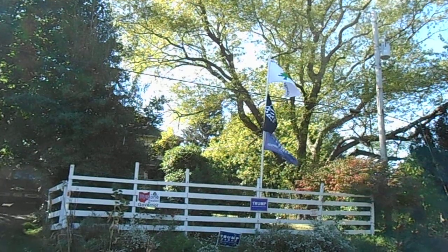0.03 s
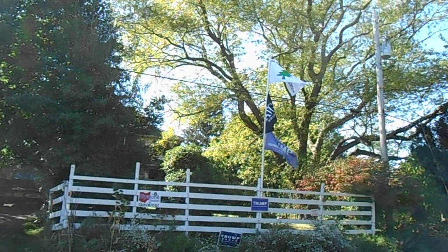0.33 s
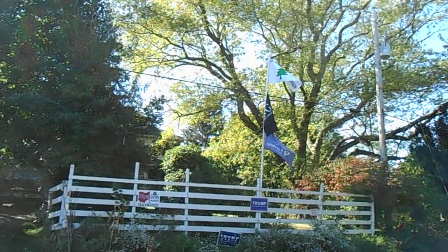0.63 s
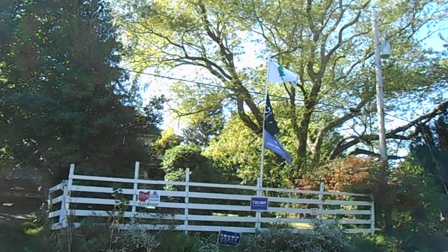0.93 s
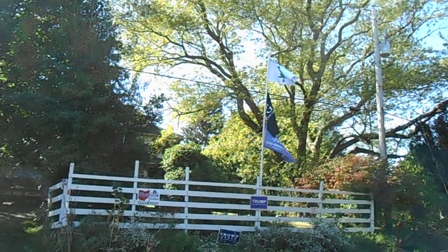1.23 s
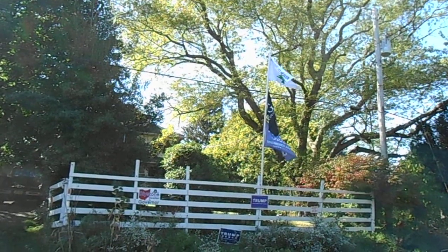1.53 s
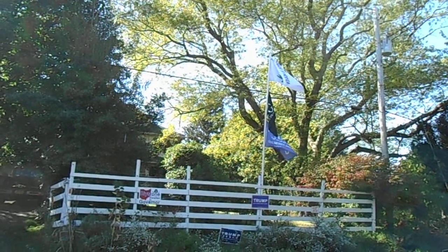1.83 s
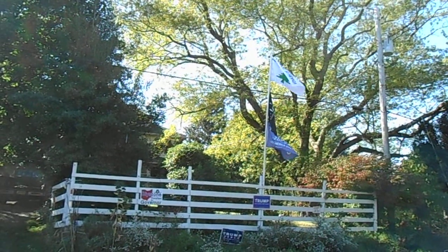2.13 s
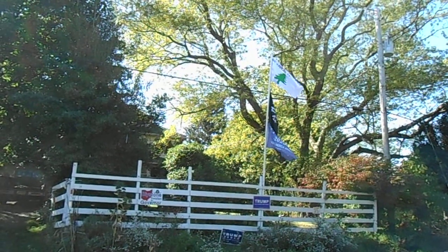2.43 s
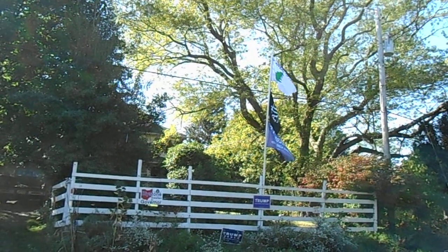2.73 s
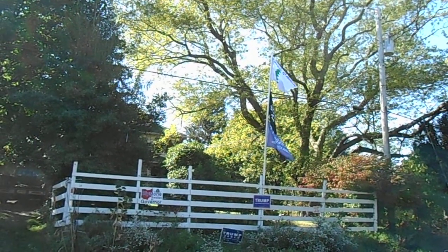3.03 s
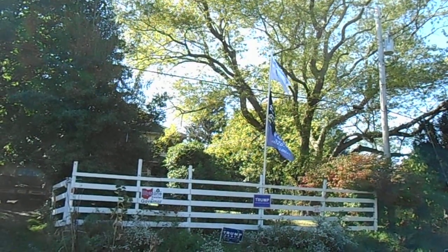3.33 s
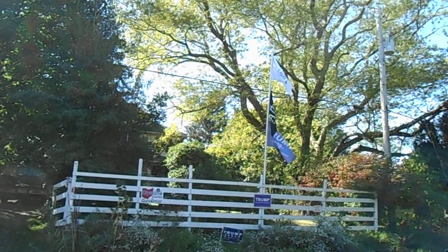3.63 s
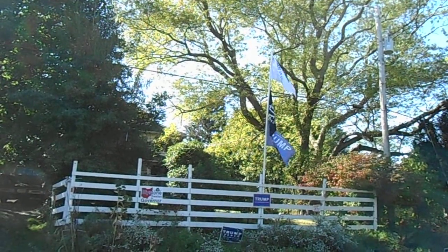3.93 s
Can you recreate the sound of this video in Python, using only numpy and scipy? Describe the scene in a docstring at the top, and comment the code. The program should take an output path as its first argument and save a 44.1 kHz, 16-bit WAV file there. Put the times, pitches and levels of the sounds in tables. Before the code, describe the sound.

Traffic rushes steadily along a highway behind trees, tyres roaring over a low engine drone. One nearer car whines past at the start, then wind bumps the microphone while crickets trill faintly and leaves rustle in a garden.

```python
"""Traffic rushes along a highway behind trees: tyres roar and sing over a low drone of engines.
One nearer car whines past in the first second, and a few exhaust notes swell and fade.
A breeze rustles the leaves and bumps the microphone with short buffets and pops of swirling air.
Crickets trill faintly in the garden, one tiny falling tone for each stroke of their wings."""
import sys
import numpy as np
from scipy import signal
from scipy.fft import rfft, irfft, next_fast_len
from scipy.io import wavfile
from scipy.ndimage import uniform_filter1d, minimum_filter1d, map_coordinates

SR = 44100
rng = np.random.default_rng(int(sys.argv[2]) if len(sys.argv) > 2 else 0)


def pcm_store(signal):
    """Save signal as 16-bit PCM."""
    levels = np.round(np.clip(np.atleast_2d(signal), -1, 1) * 32767)
    wavfile.write(sys.argv[1], SR, levels.astype(np.int16).T)


N = 176400  # 4 seconds
T = np.arange(N) / SR


def amp(db):
    """Turn decibels into a number to multiply by."""
    return 10 ** (np.asarray(db) / 20)


def unit(x):
    """Scale a signal so that its average strength (rms) is 1."""
    return x / np.sqrt(np.mean(x ** 2) + 1e-20)


def curves(rows):
    """Join a table's points with straight lines: one curve for each column after the time."""
    times, *columns = np.transpose(rows)
    return [np.interp(T, times, column) for column in columns]


def wobble(rate):
    """A smooth random curve that passes through `rate` new values a second."""
    return map_coordinates(rng.standard_normal(int(N * rate / SR) + 4), [T * rate])


def swell(peak_s, half_width_s):
    """A bell-shaped rise and fall around one moment."""
    return np.exp(-.5 * ((T - peak_s) / half_width_s) ** 2)


def filtered(x, response):
    """Make each frequency in x louder or softer by response(hz)."""
    size = next_fast_len(N + SR // 2)
    return irfft(rfft(x, size) * response(np.fft.rfftfreq(size, 1 / SR)), size)[:N]


def rush(spectrum, patchy_db):
    """Rushing noise of strength 1 with the given tone colour and random louder and softer patches."""
    grid = signal.stft(rng.standard_normal(N), nperseg=1024)[2]  # frequency by time
    patches = uniform_filter1d(rng.standard_normal(grid.shape), size=4, axis=0)
    patches = unit(uniform_filter1d(patches, size=10, axis=1))
    noise = signal.istft(grid * amp(patchy_db * patches), nperseg=1024)[1][:N]
    freqs, db = np.transpose(spectrum)
    return unit(filtered(noise, lambda hz: amp(np.interp(np.log(hz + 1), np.log(freqs), db))))


# How loud the high hiss is (time [s], level [dB])
HISS_LEVELS = [(0, -34), (.25, -34.5), (.65, -38), (.98, -39.5), (1.06, -43.5), (1.45, -43.5),
               (1.66, -41.5), (1.8, -44), (2.08, -43), (2.12, -42.5), (2.4, -44), (2.68, -39.5),
               (2.8, -37.5), (3.17, -36.5), (3.21, -41.5), (3.5, -41.5), (3.62, -39.5), (4, -40.5)]
# Tone colour of the hiss (frequency [Hz], relative level [dB])
HISS_SPECTRUM = [(500, -17), (2200, 3), (3000, 3.5), (3900, -0.5), (4700, 2), (5400, -2), (7400, -2),
                 (8500, -7), (10300, -16.5), (11000, -36)]

def hiss():
    """Road and trees together make a thin, airy hiss."""
    level_db, = curves(HISS_LEVELS)
    return amp(level_db) * rush(HISS_SPECTRUM, patchy_db=1.0)


# Short rustles (time [s], half width [s], level [dB])
LEAF_RUSTLES = [(2.13, 0.026, -49), (2.31, 0.099, -44.5), (2.56, .1, -45), (2.738, 0.0069, -38),
                (2.85, .06, -44), (2.961, 0.0059, -39.5)]
# Tone colour of the leaves (frequency [Hz], relative level [dB])
LEAF_SPECTRUM = [(1500, -31), (3500, -4.5), (5200, 3.5), (7800, -2), (10200, -11.5), (11000, -32)]

def leaves():
    """The breeze catches the leaves in bright, fluttering rustles."""
    rustles = sum(amp(db) * swell(time_s, half_s) for time_s, half_s, db in LEAF_RUSTLES)
    flutter = amp(2.1 * wobble(70))
    return rustles * flutter * rush(LEAF_SPECTRUM, patchy_db=-0.7)


# Trills (start [s], end [s], pitch [Hz], strokes [per s], pitch fall in a stroke [Hz],
# share of the time sounding [0-1], level relative to the hiss [dB], fade-in [s], fade-out [s])
CRICKET_TRILLS = [(-.105, 4.1, 7130, 24.5, 70.2, 0.62, -6.5, .3, 0.045),
                  (-.491, 1.85, 8270, 25.5, 90, 0.45, -3.5, 1.1, 0.51),
                  (-.1, 2.1, 6260, 17, 700, 0.6, -7, .05, 1.1),
                  (-.1, 4.1, 4650, 58.6, 200, 0.6, -9.5, .6, .8),
                  (.32, .57, 4890, 39, 61, 0.75, -5, .02, .015),
                  (.755, 1.095, 4470, 47, 160, .7, -2.5, .008, .04),
                  (1.485, 1.76, 4450, 33, 121, 0.5, 0, .015, .05)]

def crickets():
    """Each wing stroke is a short falling tone; the trills get louder and softer with the hiss."""
    hiss_db, = curves(HISS_LEVELS)
    out = np.zeros(N)
    for start, end, hz, rate, fall_hz, share, db, fade_in_s, fade_out_s in CRICKET_TRILLS:
        stroke_count = (T - start) * rate + 0.045 * wobble(6)  # slightly uneven timing
        stroke = np.clip((stroke_count % 1) / share, 0, 1)  # runs from 0 to 1, then waits
        pitch = hz + fall_hz * (.5 - stroke) + 24.1 * wobble(40)
        roughness = 0.43 * wobble(400)
        phase = 2 * np.pi * np.cumsum(pitch) / SR + roughness
        fade = np.clip(np.minimum((T - start) / fade_in_s, (end - T) / fade_out_s), 0, 1)
        level_db = hiss_db + db + 2.2 * wobble(18)
        out += amp(level_db) * fade * np.sin(np.pi * stroke) * np.sin(phase)
    return out


def garden_echo(sound, echo_db=-9.5, ring_s=.15):
    """Fence and bushes smear a sound with an echo that fades by 60 dB in ring_s."""
    echo = (rng.standard_normal(N) * np.exp(-np.log(1000) * T / ring_s))[:SR // 2]
    return sound + amp(echo_db) * signal.fftconvolve(sound, echo / np.linalg.norm(echo))[:N]


# Bumps of wind (time [s], half width [s], level [dB], upper edge of the noise [Hz])
WIND_BUFFETS = [(0.975, 0.023, -19.5, 400), (1.001, 0.0067, -10, 590), (1.024, 0.0031, -10, 503),
                (1.19, 0.022, -18, 280), (1.28, 0.038, -22, 328), (1.4, 0.066, -24.5, 318),
                (1.691, 0.038, -18, 338), (2.006, 0.055, -29, 280), (3.156, 0.004, -14.5, 348),
                (3.182, 0.012, -11, 520), (3.193, 0.0048, -9.5, 149), (3.264, 0.018, -21.5, 130),
                (3.589, 0.019, -18, 344), (3.722, 0.0082, -18.5, 305)]

def wind_buffets(wake_db=-6, wake_decay_s=0.025, wake_edge_hz=149):
    """Churning air hits the microphone in short bursts, each trailing a low rumble, its wake."""
    out = np.zeros(N)
    wake = unit(filtered(rng.standard_normal(N), lambda hz: hz / (1 + (hz / wake_edge_hz) ** 4)))
    for time_s, half_s, db, edge_hz in WIND_BUFFETS:
        def colour(hz):
            gentle_slope = (1 + (hz / 160) ** 2) ** -0.305
            steep_edge = 1 / np.sqrt(1 + (hz / edge_hz) ** 10.2)
            deep_bass_cut = hz / (hz + 40)
            return gentle_slope * steep_edge * deep_bass_cut
        shape = swell(time_s, half_s)
        burst = shape * filtered(rng.standard_normal(N), colour)
        out += amp(db) * burst * np.linalg.norm(shape) / np.linalg.norm(burst)
        wake_shape = np.where(T < time_s, shape, np.exp(-np.abs(T - time_s) / wake_decay_s))
        out += amp(db + wake_db) * wake_shape * wake
    return out


# Tiny swirls of air (time [s], depth of the dip before the leak [dB], half width [s])
WIND_POPS = [(1.234, 0.5, 0.00086), (1.257, -2, 0.00058), (1.321, -4, 0.0012), (1.389, -5, 0.0008),
             (1.45, -4, 0.0025), (1.973, -8, 0.00084), (2.097, -7, 0.0017)]

def wind_pops(leak_hz=85):
    """Each swirl is one dip in pressure; the microphone lets slow changes leak out, so it rebounds."""
    dips = -sum(amp(db) * swell(time_s, half_s) for time_s, db, half_s in WIND_POPS)
    return filtered(dips, lambda hz: 1j * hz / (leak_hz + 1j * hz))


# Tone colour of the engine drone (frequency [Hz], relative level [dB])
DRONE_SPECTRUM = [(10, -3), (28, -2.5), (60, 1), (100, -2), (145, -4), (190, -7), (250, -9.5), (320, -16),
                  (420, -17), (2000, -80)]
# Engines that stand out as they pass (loudest time [s], half width [s], pitch [Hz], level [dB])
EXHAUST_NOTES = [(0.182, 0.23, 68.6, -26), (0.394, 0.45, 232.5, -32), (1.94, 0.25, 144.3, -26),
                 (1.998, 0.28, 228.2, -33), (2.778, 0.23, 135.9, -28.5)]

def engines(drone_db=-25):
    """Engines blend into a steady drone, and a few wavering exhaust notes swell out of it."""
    out = amp(drone_db + .8 * wobble(14)) * rush(DRONE_SPECTRUM, patchy_db=1.4)
    for time_s, half_s, hz, db in EXHAUST_NOTES:
        waver = 1.07 * wobble(24)
        note = np.sin(2 * np.pi * hz * T + waver)
        out += amp(db + 3.3 * wobble(22)) * swell(time_s, half_s) * note
    return out


# How loud the nearer car is (time [s], level [dB])
WHINE_LEVELS = [(0, -26), (.33, -18), (.55, -20.5), (.65, -19.5), (.8, -17.8), (.9, -21), (.945, -18),
                (1.04, -32), (1.4, -71)]
# Its tone colour, with two narrow humps (frequency [Hz], relative level [dB])
WHINE_SPECTRUM = [(500, -28.5), (740, -7), (910, -0.5), (1030, -7), (1270, 1.5), (1420, -2), (1700, -11.5),
                  (1950, -20.5), (2400, -17.5), (3300, -31), (6000, -65)]

def near_car():
    """One nearer car's tyres whine above the rest, then drop away."""
    level_db, = curves(WHINE_LEVELS)
    return amp(level_db) * rush(WHINE_SPECTRUM, patchy_db=2.0)


# How loud the traffic's tyres are (time [s], low roar [dB], higher singing [dB])
TYRE_LEVELS = [(0, -32, -21.5), (.85, -29.5, -26.5), (1.1, -28, -24.5), (1.3, -26.5, -24.5),
               (1.46, -25, -26), (1.65, -24, -25.5), (1.9, -24, -31.5), (2.25, -21.5, -30.5),
               (2.41, -27, -26), (2.58, -21, -24), (2.9, -22.5, -24), (3.03, -20, -29),
               (3.14, -21.5, -20.5), (3.23, -25.5, -27), (3.6, -25, -23.5), (4, -26, -24.5)]
# Tone colours of the roar and the singing (frequency [Hz], relative level [dB])
ROAR_SPECTRUM = [(150, -29.5), (350, -12), (480, -7.5), (660, -1.5), (900, -3), (1200, -9.5), (1800, -19),
                 (3000, -31), (6000, -63.5)]
SINGING_SPECTRUM = [(300, -28.5), (650, -11.5), (900, -1.5), (1100, -1), (1350, -2.5), (1600, -5),
                    (2000, -14), (2500, -21.5), (3600, -29.5), (7000, -59.5)]

def tyres():
    """Tyres on the road: a low roar and a higher singing trade places as vehicles come and go."""
    roar_db, singing_db = curves(TYRE_LEVELS)
    roar = amp(roar_db + 0.26 * wobble(12)) * rush(ROAR_SPECTRUM, patchy_db=1.8)
    singing = amp(singing_db + 0.32 * wobble(12)) * rush(SINGING_SPECTRUM, patchy_db=0.5)
    return roar + singing


def scene():
    """Add garden, breeze and highway together in one channel."""
    background = hiss() + leaves() + garden_echo(crickets())
    breeze = wind_buffets() + wind_pops()
    highway = engines() + near_car() + tyres()
    return (background + breeze + highway)[None]


def record(dry, ceiling=.7, top_hz=11500):
    """Turn the volume down briefly at peaks above the ceiling, then cut the highest treble."""
    needed_gain = np.minimum(1, ceiling / (np.abs(dry[0]) + 1e-9))
    smooth_gain = uniform_filter1d(minimum_filter1d(needed_gain, size=401), size=401)
    return filtered(dry[0] * smooth_gain, lambda hz: 1 / np.sqrt(1 + (hz / top_hz) ** 80))[None]


dry = scene()
out = record(dry)
pcm_store(out)
```